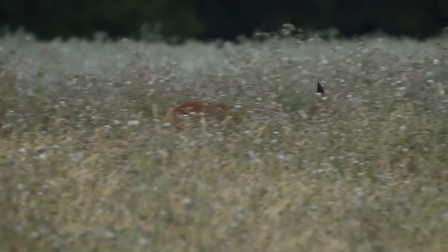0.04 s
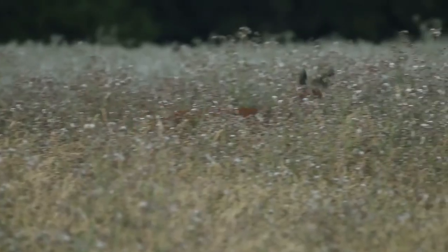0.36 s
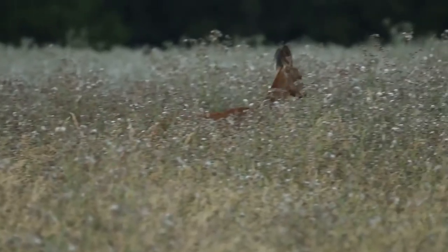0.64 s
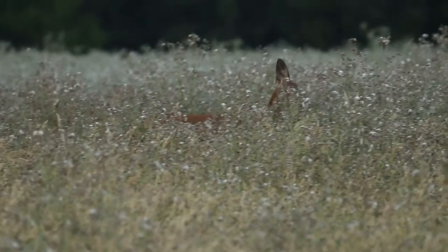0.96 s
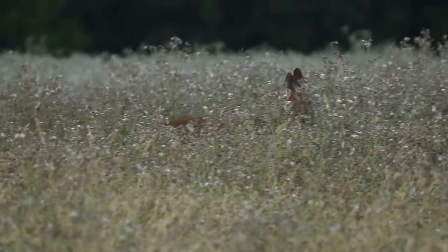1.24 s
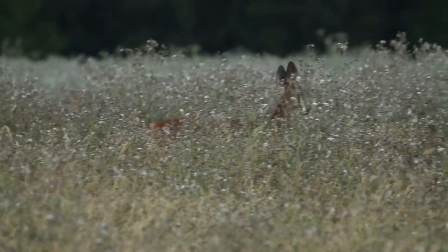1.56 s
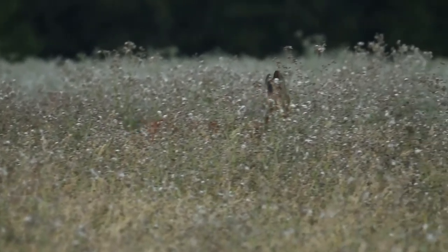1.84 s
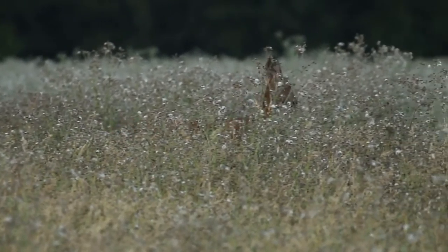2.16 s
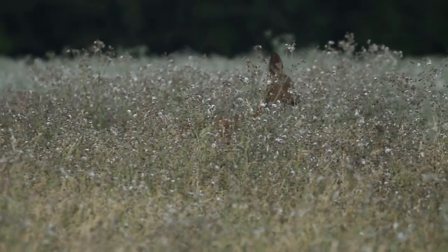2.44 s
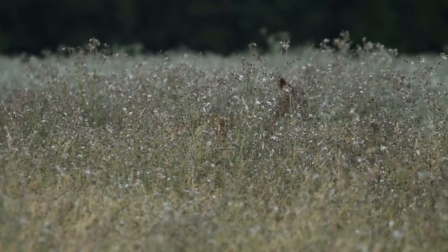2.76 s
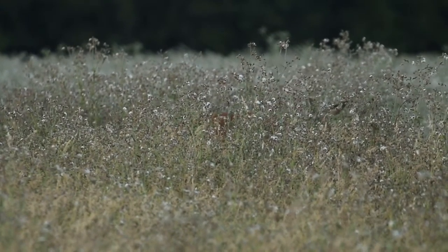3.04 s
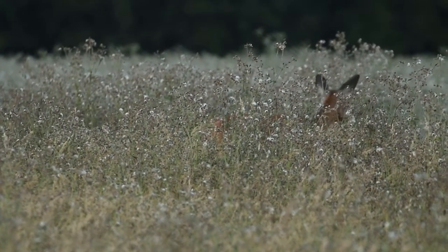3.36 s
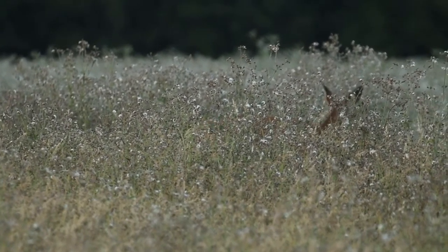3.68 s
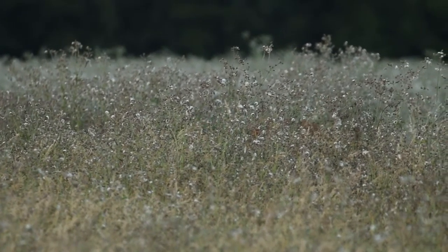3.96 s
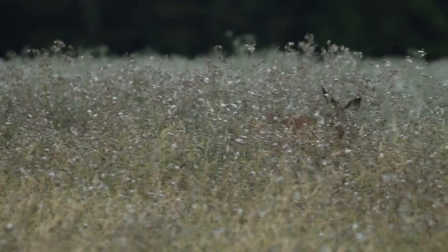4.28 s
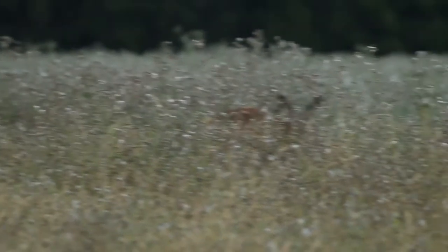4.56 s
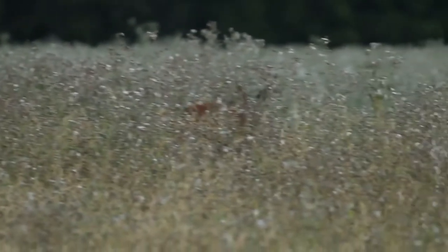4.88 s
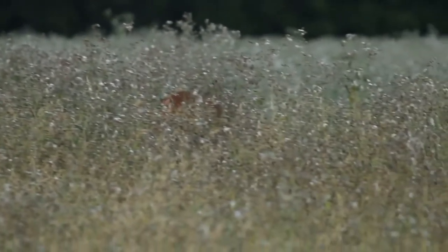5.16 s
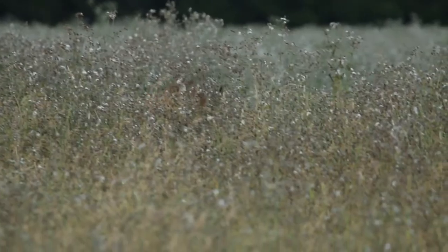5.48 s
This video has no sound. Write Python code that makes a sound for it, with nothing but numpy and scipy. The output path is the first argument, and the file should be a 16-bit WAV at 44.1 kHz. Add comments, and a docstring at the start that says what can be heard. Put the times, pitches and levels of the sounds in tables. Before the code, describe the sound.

A faint, low distant rumble and a soft, wide hiss run throughout in an open meadow. Very faint bird notes sound far off at the start. At about 0.4 seconds a songbird comes in slightly to the left with a soft warble, then quick chips and a thin high whistle. It grows louder with a warble at 1.1 seconds and rushes into twittering, tumbling runs of slightly raspy chips, repeating a figure until about 2.6 seconds. A rising whistle follows, then a cascade of chips sung twice between 2.8 and 3.5 seconds. Around 3.8 seconds comes a falling note, then a pulsing trill and more chips. A high warble at 4.5 seconds leads to two matching falling slurs between 4.8 and 5.3 seconds, and a buzzy descending trill ends near 5.6 seconds. The vegetation adds a light, short scatter to the song.

```python
"""At the edge of a meadow, a songbird sings a fast, varied song a little to the left.
Its syrinx makes a nearly pure whistle, drawn into glides, shaken into warbles and swept into runs of
short chips; fast sweeps turn raspy, and several figures come twice. The vegetation scatters the song
back. Behind it lie a few faint notes from farther off, a low distant rumble and a soft hiss."""
import sys
import numpy as np
from scipy import signal
from scipy.fft import rfft, irfft, next_fast_len
from scipy.io import wavfile
from scipy.ndimage import uniform_filter1d

SR = 44100
rng = np.random.default_rng(int(sys.argv[2]) if len(sys.argv) > 2 else 0)


def transcribe(signal):
    """Save signal, clipped to [-1, 1], as a 16-bit WAV file at the path in sys.argv[1]."""
    frames = np.atleast_2d(signal).T
    limited = np.clip(frames, -1, 1)
    pcm = np.round(limited * 32767).astype(np.int16)
    wavfile.write(sys.argv[1], SR, pcm)


N = 247394


def undb(db):
    """Decibels to gain."""
    return 10 ** (np.asarray(db) / 20)


def colour(points, hz):
    """Read a curve of (frequency [Hz], value) points on a log-frequency axis."""
    frequencies, values = np.transpose(points)
    return np.interp(np.log(np.maximum(hz, 1)), np.log(frequencies), values)


def walk(rate_hz, size=N):
    """Smooth random wandering with a spread near 1."""
    hold = max(int(SR / rate_hz), 1)
    steps = np.repeat(rng.standard_normal(size=N // hold + 1), hold)[:size]
    return 1.3 * uniform_filter1d(uniform_filter1d(steps, hold), hold)


def turn(hz):
    """Phase of an oscillator running at hz."""
    return 2 * np.pi * np.cumsum(hz) / SR


def add(track, start, sound):
    """Mix a sound into the track at a time in seconds."""
    i = max(int(start * SR), 0)
    track[i:i + len(sound)] += sound[:max(N - i, 0)]


def follow(rows, edge_s=0.0038):
    """A gate with soft edges, then one straight-line envelope for each column after the time."""
    times, *columns = np.transpose(rows)
    t = np.arange(times[0], times[-1], 1 / SR)
    from_edge = np.minimum(t - times[0], times[-1] - t)
    gate = np.sin(np.pi / 2 * np.clip(from_edge / edge_s, 0, 1)) ** 2
    return gate, *(np.interp(t, times, column) for column in columns)


def glide(u, first_hz, last_hz, settle):
    """Pitch moves fast, then eases to its goal (the reverse if settle is negative); u runs 0-1."""
    return first_hz + (last_hz - first_hz) * np.expm1(-settle * u) / np.expm1(-settle)


def effort(u, first_db, last_db, swell_db):
    """Level drifts from first to last, with a swell on top in the middle."""
    return first_db + (last_db - first_db) * u + swell_db * np.sin(np.pi * u)


def air(level_db=-55, sway_db=0.2):
    """The bed: distant rumble, shared by both sides and leaning left, under a smooth, wide hiss."""
    # tone of the still air: (frequency [Hz], relative spectral level [dB])
    spectrum = [(20, -0.5), (55, -1.5), (100, -5.5), (200, -10.5), (400, -16.5), (800, -24), (1400, -28.5),
                (3000, -30), (6000, -34), (10000, -36), (15500, -37.5)]
    # how alike the two sides are: (frequency [Hz], correlation [0-1])
    likeness = [(30, .88), (80, .72), (170, .3), (400, .12), (1500, .02)]
    # lean to the left: (frequency [Hz], left minus right [dB])
    pan = [(40, 3), (100, 2.4), (250, 1), (1500, 1.5), (12000, 2)]
    size = next_fast_len(N)
    hz = np.arange(size // 2 + 1) * SR / size
    alike = np.clip(colour(likeness, hz), 0, 1)
    mid = rfft(rng.standard_normal(size)) * np.sqrt(1 + alike)
    side = rfft(rng.standard_normal(size)) * np.sqrt(1 - alike)
    db = colour(spectrum, hz) + np.array([[1], [-1]]) * colour(pan, hz) / 2
    bed = irfft(np.array([mid + side, mid - side]) * undb(db), size)[:, :N]
    bed *= undb(sway_db * walk(rate_hz=2.75))
    return bed / np.std(bed) * undb(level_db)


def held_note(length, first_hz, last_hz, settle, first_db, last_db, edge_s, waver=0.0021):
    """Pitch and envelope of one drawn-out note, which is never quite steady."""
    gate, u = follow([(0, 0), (length, 1)], edge_s)
    hz = glide(u, first_hz, last_hz, settle) * (1 + waver * walk(rate_hz=161, size=len(u)))
    return hz, gate * undb(effort(u, first_db, last_db, swell_db=1.77))


def whistles(third_db=-11, rough=0):
    """Plain whistles: one smooth glide or held pitch each."""
    # glides: (start [s], length [s], first pitch [Hz], last pitch [Hz], settle [bend of the glide],
    #          first level [dB], last level [dB])
    glides = [ (0.022, .055, 5970, 6060, 1, -69, -71), (.025, .1, 4300, 2010, -0.2, -65, -75),
              (0.296, 0.046, 3500, 2300, .2, -60, -73), (.842, 0.018, 4500, 4500, 1, -49, -40),
              (0.862, 0.23, 4216, 4727, 2, -41.5, -38), (1.707, .15, 4970, 4260, -.3, -71, -70),
              (2.645, 0.14, 3160, 4280, 1.6, -36.5, -31), (3.641, 0.03, 3070, 2872, .2, -40, -32.5),
              (3.668, 0.036, 2830, 5260, 1.3, -35, -40.5), (5.33, 0.028, 4000, 1730, 2.3, -38, -54.5),
              (5.338, .025, 5860, 3230, 1.5, -38, -49.5)]
    for start, *shape in glides:
        hz, envelope = held_note(*shape, edge_s=0.004)
        yield start, hz, envelope, third_db, rough


def shaken(hz, envelope, rate_hz, swing_hz, pulsing, valve_snap=3.0):
    """One muscle rhythm moves pitch and air valve together: loudest on each upward sweep."""
    shake = turn(rate_hz)
    shut = (1 - np.tanh(valve_snap * np.cos(shake)) / np.tanh(valve_snap)) / 2
    return hz + swing_hz * np.sin(shake), envelope * (1 - np.clip(pulsing, 0, 1) * shut)


def warbles(rough=0):
    """Whistles shaken at a rate and depth that drift through the note."""
    # shaken glides: (start [s], length [s], first pitch [Hz], last pitch [Hz], settle [bend],
    #   first level [dB], last level [dB], fade [s], first shake rate [Hz], last shake rate [Hz],
    #   first swing [Hz], last swing [Hz], pulsing [0-1], third harmonic trim [dB])
    trills = [ (.17, .13, 3450, 3560, 3.5, -57, -61, 0.027, 62, 61, 43, 200, .3, -10),
              (.415, 0.21, 3480, 3935, -1.5, -46.5, -39.5, 0.019, 63, 59.4, 99, 574, 0.38, -18),
              (1.134, 0.22, 3576, 4010, 0.85, -28, -30.5, .017, 67.5, 55.7, 17, 630, 0.4, -14),
              (1.34, 0.27, 2400, 2730, 0.5, -65, -69, .04, 80, 80, 170, 200, .6, -10),
              (1.542, 0.083, 3705, 3737, 2, -30, -30, 0.0023, 66.8, 70.5, 560, 544, .25, -7.5),
              (1.83, 0.048, 5305, 5125, 2.5, -38, -40, 0.017, 185, 189, 45, 40, 0.63, -10),
              (3.922, .257, 3412, 3238, 1.5, -35, -32.5, 0.0066, 73, 71.7, 140, 70, 0.76, -29),
              (4.5, .24, 2220, 2770, 0.5, -65.5, -62.5, .04, 80, 79.7, 150, 200, .85, -10),
              (4.538, 0.22, 5105, 4385, 1.1, -38.5, -35, 0.0048, 122.3, 67, 45, 25, 0.46, -16),
              (5.396, 0.19, 5790, 3486, 2.5, -39.5, -32, 0.026, 180.4, 153.6, 550, 510, 0.55, -8)]
    for start, *shape, first_rate, last_rate, first_swing, last_swing, pulsing, third_db in trills:
        hz, envelope = held_note(*shape)
        rate = np.linspace(first_rate, last_rate, len(hz))
        ease = np.sin(np.linspace(0, np.pi / 2, len(hz))) ** 2
        swing = first_swing + (last_swing - first_swing) * ease
        yield start, *shaken(hz, envelope, rate, swing, pulsing), third_db, rough


def chip_runs():
    """Twitters, rattles and cascades: strings of like chips whose gaps change evenly."""
    # runs: (first chip's middle [s], chips [count], first gap [s], last gap [s], chip length [s],
    #   first pitch [Hz], last pitch [Hz], sweep within a chip [Hz], first level [dB], last level [dB])
    runs = [ (.668, 4, .01, .0095, 0.0059, 3900, 4960, 650, -33, -48.5),
            (0.7717, 3, 0.015, 0.012, 0.013, 3790, 2580, -500, -36, -41),
            (1.398, 4, .029, .031, .0075, 4830, 5740, 600, -33.5, -35),
            (1.409, 4, 0.03, 0.027, .011, 4295, 5130, 650, -29.5, -29.5),
            (1.69, 5, 0.02, 0.023, .009, 2660, 2586, 1250, -33.5, -33.5),
            (1.92, 6, 0.0082, .0168, 0.008, 4910, 3210, -50, -29.5, -30.5),
            (2.022, 4, 0.0099, 0.015, 0.0059, 3880, 2100, 350, -30, -37.5),
            (2.069, 4, 0.0064, 0.0092, 0.0045, 2020, 2010, 200, -42.5, -41.5),
            (2.1294, 3, .023, .0225, .008, 2820, 2960, 550, -34, -33.5),
            (2.127, 3, .0225, 0.031, 0.015, 1826, 1904, 1002, -52, -51),
            (2.837, 2, 0.015, .0153, 0.0049, 4950, 4740, 700, -38, -29.5),
            (2.88, 2, 0.014, .015, .006, 4720, 5050, 604, -32, -31.5),
            (2.93, 4, .0177, .0177, .0105, 4574, 3182, -650, -30.5, -30),
            (3.109, 4, 0.0093, .012, 0.0075, 4130, 2425, -900, -27, -37.5),
            (3.572, 5, 0.01, .0085, 0.0072, 4300, 3560, -1100, -31, -29.5),
            (3.71, 2, 0.02, .0206, 0.013, 4390, 4340, -380, -28.5, -32.5),
            (4.2343, 6, 0.0081, 0.0095, .006, 3400, 3180, -1500, -39.5, -31.5),
            (4.344, 3, .017, .017, 0.0074, 2735, 2950, 560, -36.5, -32)]
    for start, count, first_gap, last_gap, length, first_hz, last_hz, sweep, first_db, last_db in runs:
        u = np.linspace(0, 1, count)
        gaps = np.linspace(first_gap, last_gap, count - 1)
        times = start + np.append(0, np.cumsum(gaps))
        pitches = glide(u, first_hz, last_hz, settle=1)
        levels = effort(u, first_db, last_db, swell_db=2.55)
        for middle, hz, db in zip(times, pitches, levels):
            yield middle, length, hz, sweep, db


def chips(third_db=-11, rough=0.1):
    """Very short sweeps, single or in runs, pushed hard and so always a little rough."""
    # lead-in and linking chips: (middle [s], length [s], pitch [Hz], sweep [Hz], level [dB])
    singles = [ (.658, 0.0072, 4100, -240, -39.5), (.7045, 0.0068, 3800, -1200, -35.5),
               (.731, .012, 3620, 230, -33), (.745, 0.004, 3900, -1730, -33), (.76, 0.0065, 5300, 270, -47),
               (.865, 0.0076, 3950, 1460, -31.5), (1.656, 0.0064, 3810, 200, -28),
               (1.6675, 0.011, 3370, -330, -29.5), (1.8812, .014, 4410, 1190, -28.5),
               (1.902, 0.012, 3710, -1700, -30.5), (2.109, 0.0075, 2470, 520, -35.5),
               (2.5955, 0.0046, 2860, 570, -32), (2.8595, 0.0073, 3986, 102, -26.5),
               (2.912, 0.02, 5150, -100, -35), (3.0445, 0.016, 4130, 1400, -33),
               (3.0655, 0.0051, 3850, -1900, -26.5), (3.1006, 0.0036, 5010, 398, -28),
               (3.553, 0.005, 5900, 140, -52), (3.5614, 0.0041, 4940, -300, -29.5),
               (4.23, .009, 3970, 590, -35.5), (4.301, 0.0089, 3945, 490, -28),
               (4.313, 0.018, 4510, -81, -36), (4.456, 0.024, 6030, -150, -43.5),
               (4.4775, 0.031, 4725, -890, -33.5), (4.532, 0.0036, 5800, 160, -39.5)]
    for middle, length, hz, sweep, db in [*singles, *chip_runs()]:
        u = np.linspace(-0.5, 0.5, max(int(length * SR), 2))
        envelope = undb(db) * np.cos(np.pi * u)
        yield middle - length / 2, hz + sweep * u, envelope, third_db, rough


def slurs(rough=0):
    """Shaken notes that start high and then fall away."""
    # falling notes: (shake rate [Hz], third harmonic trim [dB], breakpoints), each breakpoint
    #   (time [s], pitch [Hz], level [dB], swing [Hz], pulsing [0-1])
    falls = [ (163, -16, [(3.75, 4620, -37, 44, .6), (3.775, 4790, -31, 36, 0.5),
             (3.812, 4800, -40, 25, 0.35), (3.835, 4230, -30, 0, 0), (3.849, 3640, -29, 0, 0.2),
             (3.86, 2800, -34, 0, 0), (3.876, 2500, -49, 0, 0)]), (75.8, -4, [(4.793, 4500, -44, 432, .2),
             (4.812, 4210, -33, 393, 0.2), (4.834, 3952, -24.5, 30, 0.32), (4.886, 3794, -34.5, 0, 0.5),
             (4.92, 3150, -29.5, -4, 0.28), (4.947, 2796, -35, 0, 0), (4.986, 2618, -30.5, 4, 0.03),
             (5.012, 2470, -43, 0, 0)])]
    for rate_hz, third_db, breakpoints in falls:
        start = breakpoints[0][0]
        gate, hz, db, swing, pulsing = follow(breakpoints)
        rate = np.full(len(hz), rate_hz)
        yield start, *shaken(hz, gate * undb(db), rate, swing, pulsing), third_db, rough


def rasp(hz, breath, level_db=-20, db_per_octave=10, pivot_hz=4100):
    """A stretch of breath noise that grows louder as the pitch climbs."""
    offset = rng.integers(N // 2)
    return breath[offset:offset + len(hz)] * undb(level_db + db_per_octave * np.log2(hz / pivot_hz))


def syrinx(hz, envelope, third_db, rough, breath, jitter=0.03, jitter_rate_hz=1000, smear_rad=0.53):
    """A nearly pure whistle; fast sweeps and hard pushes shake it, blur its harmonics and add rasp."""
    # what throat and beak let out: (overtone frequency [Hz], base level against the note [dB])
    overtones = [(3500, -4), (5500, -38.5), (6800, -29), (8000, -32.5), (9300, -22), (10600, -19.5),
                 (12200, -31), (13800, -26), (16000, -36)]
    full_strain_hz_per_s, rough_lift_db = 370000, 6.5
    sweep_speed = np.abs(np.gradient(hz)) * SR
    strain = np.sqrt(np.clip(sweep_speed / full_strain_hz_per_s + rough, 0, 1))
    steps = np.arange(len(hz)) * jitter_rate_hz / SR
    wobble, blur = (np.interp(steps, np.arange(1024), row) for row in rng.standard_normal((2, 1024)))
    phase = turn(hz * (1 + jitter * strain * wobble))
    blurred_phase = phase + smear_rad * strain * blur
    second = undb(colour(overtones, 2 * hz)) * np.sin(2 * blurred_phase)
    third = undb(colour(overtones, 3 * hz) + third_db) * np.sin(3 * blurred_phase)
    harmonics = undb(rough_lift_db * rough) * (second + third)
    return envelope * (np.sin(phase) + harmonics + strain * rasp(hz, breath))


def song(rasp_band_hz=(7600, 12200)):
    """Every note voiced by the syrinx, some twice; the faintest stand for birds farther off."""
    # figures sung twice: (from [s], to [s], again after [s], pitch [ratio], level change [dB])
    repeats = [(1.8, 2, 0.39, 1.007, 1), (2, 2.3, .3962, 0.98, -0.5), (2.8, 3.01, 0.36, 1.006, 0),
               (3.01, 3.2, .355, 1.005, 0.5), (4.76, 5.1, 0.26, 0.99, 0)]
    band = signal.butter(4, rasp_band_hz, "band", fs=SR, output="sos")
    breath = signal.sosfilt(band, rng.standard_normal(N))
    track = np.zeros(N)
    for notes in (chips(), whistles(), warbles(), slurs()):
        for start, hz, envelope, third_db, rough in notes:
            add(track, start, syrinx(hz, envelope, third_db, rough, breath))
            for begin, end, after, ratio, change_db in repeats:
                if begin <= start < end:
                    again = syrinx(hz * ratio, envelope * undb(change_db), third_db, rough, breath)
                    add(track, start + after, again)
    return track


def scatter(t, db, onset_s, t60, cutoff_hz=7000):
    """Countless small reflections that build up and die away, their top softened."""
    build = 1 - np.exp(-(t / onset_s) ** 2)
    decay = np.exp(-np.log(1000) * t / t60)
    soften = signal.butter(1, cutoff_hz, fs=SR, output="sos")
    tail = signal.sosfilt(soften, rng.standard_normal(len(t)) * build * decay)
    return undb(db) * tail / np.sqrt(np.sum(tail ** 2))


def meadow(bird, echo_s=0.019, echo_db=-18, right_lag_s=0.000134, right_db=-7.4):
    """Direct sound, later and softer on the right, one close echo, foliage and a faint tree tail."""
    t = np.arange(int(0.7 * SR)) / SR
    sides = []
    for lag, direct_db, foliage_db in [(0, 0, -15), (right_lag_s, right_db, -18)]:
        direct = np.sinc((t - lag) * SR)
        echo = undb(echo_db) * np.sinc((t - lag - echo_s) * SR)
        foliage = scatter(t, db=foliage_db, onset_s=0.002, t60=0.14)
        trees = scatter(t, db=-39.5, onset_s=0.023, t60=0.81)
        response = undb(direct_db) * (direct + echo) + foliage + trees
        sides.append(signal.fftconvolve(bird, response)[:N])
    return np.array(sides)


def scene():
    """The bird in the meadow over the still air."""
    return meadow(song()) + air()


def record(dry):
    """A low cut drops the deepest rumble and a steep high cut trims the top of the hiss."""
    low_cut = signal.butter(2, 18, "high", fs=SR, output="sos")
    high_cut = signal.ellip(10, 0.2, 70, 15850, fs=SR, output="sos")
    return signal.sosfilt(high_cut, signal.sosfilt(low_cut, dry))


dry = scene()
out = record(dry)
transcribe(out)
```